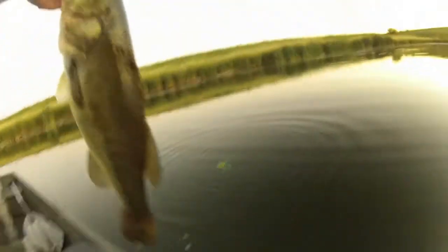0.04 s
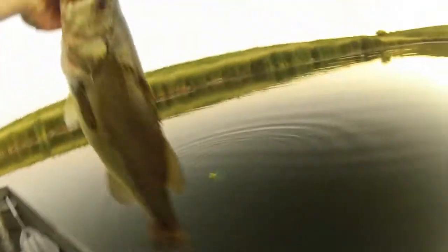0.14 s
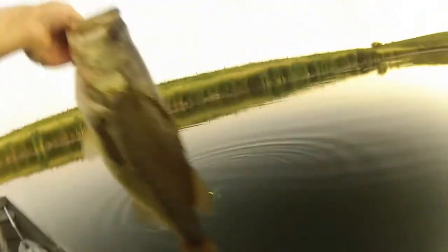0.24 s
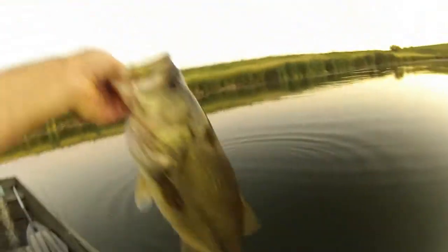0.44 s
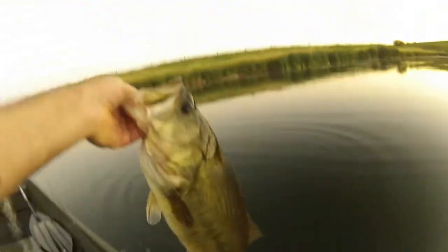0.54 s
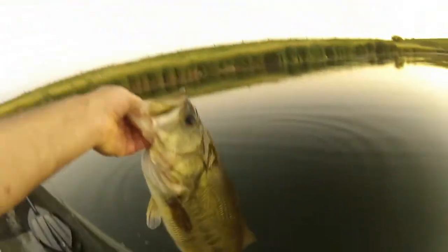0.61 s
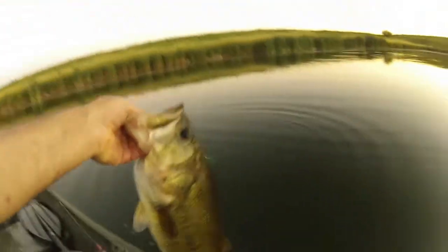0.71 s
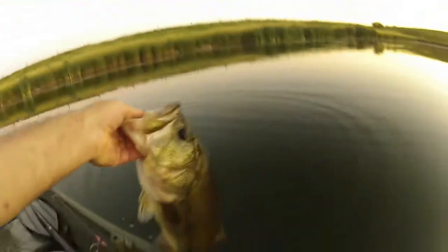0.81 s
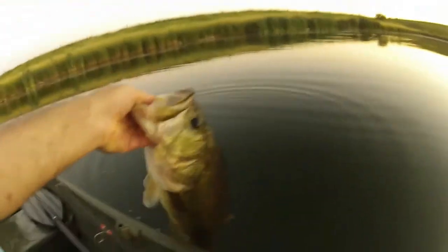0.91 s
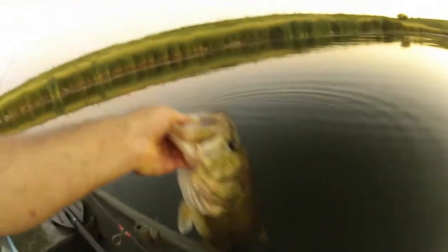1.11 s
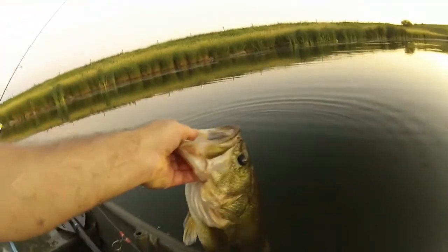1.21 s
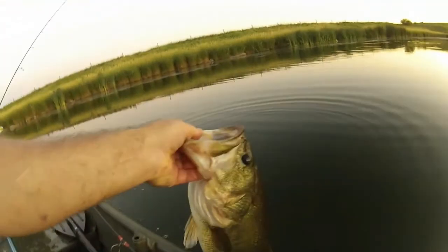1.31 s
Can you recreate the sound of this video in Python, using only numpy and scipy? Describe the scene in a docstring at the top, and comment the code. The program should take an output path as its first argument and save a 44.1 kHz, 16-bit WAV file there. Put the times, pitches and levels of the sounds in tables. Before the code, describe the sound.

A sharp, close knock on a small metal boat is followed by dull hull bumps and a quick clatter of loose gear. Soft rustling, a faint wash of pond water and a thin hiss lie underneath.

```python
"""Gear knocks once hard and several times lightly in a small metal boat on a still pond, as a fish is
handled. Each impact excites damped modes: loose parts clack, the hull thuds under shifting weight, and
stick-slip scuffs rattle it. The hull hums on after each bump, over soft rustling, a low wash and hiss.
A camera close by, in a housing, adds a thin sizzle to every low sound by aliasing."""
import sys
import numpy as np
from scipy import signal
from scipy.io import wavfile

SR = 44100
rng = np.random.default_rng(int(sys.argv[2]) if len(sys.argv) > 2 else 0)


def wrap_up_sound(samples):
    """Save the sound to the file named by the first command line argument, as 16-bit audio."""
    columns = np.atleast_2d(samples).T
    # keep every value between -1 and 1, then stretch to whole-number steps
    tamed = np.clip(columns, -1, 1)
    steps = np.round(tamed * 32767).astype(np.int16)
    wavfile.write(sys.argv[1], SR, steps)


N = 59535
T = np.arange(N) / SR
HZ = np.fft.rfftfreq(8192, 1 / SR)


def amp(db):
    """Amplitude grows tenfold for every 20 dB."""
    return 10 ** (np.asarray(db) / 20)


def unit_rms(x):
    """Normalisation to a mean power of one."""
    return x / np.sqrt(np.mean(x ** 2) + 1e-20)


def curve_at(points, hz):
    """Linear interpolation along a logarithmic frequency axis."""
    point_hz, value = np.transpose(points)
    return np.interp(np.log(hz + 1), np.log(point_hz + 1), value)


def convolve(x, response):
    """A linear system convolves its input with its impulse response."""
    return signal.fftconvolve(x, response)[:N]


def minimum_phase(gain):
    """Impulse response for a gain on HZ; the Hilbert transform of the log gain sets the phase."""
    log_gain = np.log(np.maximum(np.r_[gain, gain[-2:0:-1]], 1e-5))
    spectrum = np.exp(np.conj(signal.hilbert(log_gain)))
    return np.fft.ifft(spectrum).real[:len(gain)]


def colour(x, spectrum):
    """Spectral shaping redistributes the power of white sound and keeps its total."""
    return convolve(x, minimum_phase(unit_rms(amp(curve_at(spectrum, HZ)))))


def bed(drive, spectrum, levels):
    """Slow amplitude modulation of a continuous, coloured sound."""
    return colour(drive, spectrum) * amp(np.interp(T, *np.transpose(levels)))


def ring(modes):
    """Modal superposition: a sum of damped sines, with neighbouring modes in opposite phase."""
    return sum((-1) ** k * amp(db - 60 * T / t60) * np.sin(2 * np.pi * hz * T)
               for k, (hz, db, t60) in enumerate(modes))


def burst(start, rise, fade):
    """A linear rise, then exponential decay with time constant fade; all in seconds."""
    return np.clip((T - start) / rise, 0, 1) * np.exp(-np.maximum(T - start - rise, 0) / fade)


def radiate(x, low_hz):
    """A body small against the wavelength radiates poorly, here below low_hz."""
    return signal.sosfilt(signal.butter(2, low_hz, "highpass", fs=SR, output="sos"), x)


def slips(per_second=3500, spread_db=3):
    """Stick-slip friction releases a dense, random train of clicks of uneven size."""
    size = amp(spread_db * np.minimum(rng.exponential(1, N), 3))
    sign = rng.choice([-1., 1.], N)
    slipping = rng.random(N) < per_second / SR
    return unit_rms(size * sign * slipping)


def sizzle(x, mirror_hz=8000, top_hz=1120, tilt_hz=2020):
    """Aliasing in the camera: low tones reappear faintly on both sides of mirror_hz."""
    low = signal.sosfilt(signal.butter(4, top_hz, fs=SR, output="sos"), x)
    tilted = signal.lfilter(*signal.butter(1, tilt_hz, "highpass", fs=SR), low)
    return amp(-11) * tilted * 2 * np.cos(2 * np.pi * mirror_hz * T)


# Spectra of the wash and the hiss. Each row: frequency in Hz, relative spectral density in dB.
WASH_SPECTRUM = [(20, -26), (50, -8.5), (100, -9), (170, -0.5), (310, -1), (450, -8.5), (700, -17),
                 (1000, -33.5), (2000, -54)]
HISS_SPECTRUM = [(500, 7.5), (1500, -7.5), (2300, 8), (3400, -6.5), (4600, -9.5), (5700, 1), (6600, -20),
                 (7800, -5), (8400, -14), (9400, -26), (10400, -1.5), (12000, -32), (13600, -8),
                 (15000, -21), (16000, -39)]
# Their envelopes. Each row: time in seconds, level in dB.
WASH_ENVELOPE = [(0, -55.5), (.08, -53), (.45, -50), (.75, -51), (0.999, -43), (1.151, -51), (1.35, -51)]
HISS_ENVELOPE = [(0, -60), (.42, -73), (.65, -63.5), (.95, -60.5), (1.08, -64), (1.2, -60), (1.35, -66.5)]
def wash_and_hiss():
    """Filtered Gaussian noise gives the low wash of water on the hull and a faint hiss."""
    wash, hiss = rng.standard_normal((2, N))
    return bed(wash, WASH_SPECTRUM, WASH_ENVELOPE) + bed(hiss, HISS_SPECTRUM, HISS_ENVELOPE)


# Spectrum of the rustle. Each row: frequency in Hz, relative spectral density in dB.
RUSTLE_SPECTRUM = [(100, -19), (300, 4.5), (650, 13.5), (1000, 1.5), (2000, -2.5), (3300, -4.5), (5000, -8),
                   (6500, -14), (9000, -19), (13000, -10.5), (15000, -30), (16000, -27)]
# Its envelope. Each row: time in seconds, level in dB.
RUSTLE_ENVELOPE = [(0, -66), (.035, -52.5), (.07, -51.5), (0.129, -48.5), (0.232, -51.5), (.3, -60),
                   (.45, -62.5), (.58, -72), (.765, -58), (0.859, -57), (0.899, -54), (.98, -52.5),
                   (1.051, -66.5), (1.35, -58.5)]
def rustle():
    """Sliding friction of hand and clothes: many small slips merge into a soft noise."""
    return bed(slips(), RUSTLE_SPECTRUM, RUSTLE_ENVELOPE)


# Reverberation of the boat. Each row: frequency in Hz, gain in dB, time to decay 60 dB in seconds.
BOAT_DECAY = [(60.4, -7, 0.74), (150, -9, 1), (213, -8, 0.2), (353, -9, 0.4), (475, -6.5, 0.16),
              (620, -14, 0.28), (830, -1, 0.21), (1340, -13, 0.27), (3080, -15.5, 0.11), (15000, -30, 0.12)]
def after_ring(bumps, rise_s=0.027):
    """Reverberation: the boat's many weak modes overlap as noise, each band decaying at its own rate."""
    bands = np.array(BOAT_DECAY)
    hz, t, noise = signal.stft(rng.choice([-1., 1.], N), SR, nperseg=512)
    db = curve_at(bands[:, :2], hz)[:, None]
    t60 = curve_at(bands[:, ::2], hz)[:, None]
    equal_energy = np.sqrt(2 * np.log(1000) / (t60 * SR))  # longer decays start lower
    gain = amp(db - 60 * t / t60) * equal_energy
    tail = signal.istft(noise * gain, SR, nperseg=512)[1][:N]
    return convolve(bumps, tail * np.minimum(T / rise_s, 1))


# Rough rubs. Each row: start, rise and decay constant in seconds, body level in dB, grit level in dB.
RUBS = [(0.04, 0.0036, 0.027, -53, -73), (0.127, 0.017, 0.012, -44, -41), (0.185, 0.0043, .008, -37, -44),
        (0.468, 0.0017, 0.0043, -59, -55.5), (0.491, 0.0017, 0.058, -49.5, -56.5),
        (0.532, 0.0024, 0.007, -71, -55.5), (0.568, .001, 0.022, -39.5, -52),
        (0.6, 0.0064, 0.032, -43, -86), (0.661, 0.006, 0.0029, -43.5, -47),
        (0.772, 0.0011, 0.023, -31, -36), (0.808, 0.0053, 0.013, -26.5, -27),
        (0.845, 0.0031, 0.018, -28, -30), (0.91, 0.0041, 0.015, -28.5, -63),
        (1.309, 0.0034, 0.016, -40.5, -45)]
# The two spectra of a rub. Each row: frequency in Hz, relative spectral density in dB.
BODY_SPECTRUM = [(30, -41), (70, -32), (150, -6.5), (230, -3), (370, 4.5), (460, -8), (590, 2), (760, -6),
                 (950, -22), (1500, -38), (4000, -48)]
GRIT_SPECTRUM = [(50, -37), (200, -17), (700, 10.5), (1100, 5.5), (1600, 2), (2200, 0.5), (3500, -7),
                 (5800, -8), (6700, -9.5), (8500, -28), (9500, -11), (10500, -10), (13800, -18),
                 (15000, -34), (16000, -73)]
def scuffs():
    """Stick-slip friction in short runs, heard as a hollow body and as bright grit."""
    body = sum(amp(db) * burst(start, rise, fade) for start, rise, fade, db, _ in RUBS)
    grit = sum(amp(db) * burst(start, rise, fade) for start, rise, fade, _, db in RUBS)
    return colour(body * slips(), BODY_SPECTRUM) + colour(grit * slips(), GRIT_SPECTRUM)


# Soft blows on the hull. Each row: start in seconds, impulse level in dB, contact time in seconds.
SOFT_BLOWS = [(0.1830, -44.5, 0.00085), (0.2650, -27, 0.0054), (0.4924, -40, 0.00068),
              (0.5160, -41, 0.0027), (0.5760, -21, 0.0034), (0.6010, -21, 0.0039), (0.631, -30.5, 0.0019),
              (0.6620, -33.5, 0.003), (0.6880, -31, 0.0042), (0.7270, -41, 0.0041), (0.809, -31, 0.0024),
              (0.8440, -28.5, 0.0026), (1.309, -45.5, 0.0013)]
# Hull modes. Each row: frequency in Hz, relative level in dB, time to decay 60 dB in seconds.
HULL_MODES = [(82, -29, 0.05), (131, -2, 0.11), (162.7, -6.5, 0.17), (225, -3.5, 0.142), (275, -5.5, 0.13),
              (284, -4.5, 0.062), (339, -10.5, 0.27), (384, -8, 0.25)]
def thuds():
    """Half-sine force pulses drive the hull's low modes; a longer contact gives a duller sound."""
    force = np.zeros(N)
    for start, db, contact in SOFT_BLOWS:
        push = np.sin(np.pi * np.clip((T - start) / contact, 0, 1))
        force += amp(db) * push / (push.sum() + 1e-9)
    return radiate(convolve(force, ring(HULL_MODES)), low_hz=91)


# Loose parts. Each row: start in seconds, frequency in Hz, level in dB, time to decay 60 dB in seconds.
LOOSE_PARTS = [(0.0410, 637, -42.5, 0.055), (0.041, 3150, -43.5, 0.029), (0.1880, 394, -41.5, 0.042),
               (0.3200, 599, -33.5, .09), (0.3250, 236.5, -35, 0.21), (0.4940, 433, -30.5, 0.039),
               (0.5780, 390, -33.5, 0.042), (0.6652, 1160, -37, 0.018), (0.6660, 359, -30, 0.043),
               (0.7740, 744, -34, 0.18), (0.8110, 176, -27.5, 0.12), (0.8120, 2186, -29, 0.047),
               (0.8190, 615, -27, 0.064), (0.8477, 2120, -23.5, 0.019), (0.8140, 5870, -39, 0.022),
               (0.847, 5830, -33.5, 0.027), (0.8500, 177, -28.5, 0.1), (0.8580, 568, -23.5, 0.086),
               (0.9180, 615.4, -32, 0.15), (0.9680, 355, -36.5, 0.14), (1.0120, 337, -37, 0.18),
               (1.3110, 278, -29, 0.045), (1.3120, 524, -36, 0.077)]
def clacks():
    """Each loose part is a damped oscillator that builds up in one period and quickly dies away."""
    return sum(amp(db) * burst(start, 1 / hz, t60 / np.log(1000)) * np.sin(2 * np.pi * hz * (T - start))
               for start, hz, db, t60 in LOOSE_PARTS)


# Spectrum of a knock's crack. Each row: frequency in Hz, relative spectral density in dB.
CRACK_SPECTRUM = [(50, -26), (200, -3), (400, 14), (900, 4.5), (1400, -8.5), (2900, 1), (3800, -7),
                  (5000, -4), (6600, -17.5), (7500, -18), (9500, -18.5), (11000, -9), (13300, -10.5),
                  (15000, -31), (16000, -30)]
def crack(envelope):
    """A brief transient has a wide spectrum: the knock's attack is a burst of bright noise."""
    return colour(envelope * rng.standard_normal(N), CRACK_SPECTRUM)


# Hard contacts; the loud knock is three in quick succession.
# Each row: start in seconds, ring gain in dB, crack gain in dB.
HARD_CONTACTS = [(0.0408, -45, -38.5), (0.2416, -11, -23.5), (0.2440, -28, -21), (0.2470, -19.5, -34),
                 (0.4938, -47.5, -52), (0.569, -42, -49.5), (0.6645, -39, -63), (0.7729, -34.5, -32),
                 (0.8133, -41, -30), (0.8274, -38, -35.5), (0.849, -32.5, -31), (0.9215, -34, -59),
                 (1.1184, -48, -57.5), (1.3150, -47, -47)]
# The knock's short ring of gear and longer ring of the hull.
# Each row: frequency in Hz, relative level in dB, time to decay 60 dB in seconds.
KNOCK_MODES = [(241.2, -15, 0.32), (326, -8.5, 0.14), (359, -17.5, 0.34), (383, 4.5, 0.024),
               (484, -13, 0.17), (560.8, 1.5, 0.075), (606, -33, 0.51), (658, -14, 0.33), (755, -10, 0.092),
               (2130, -19.5, 0.039), (2430, -42, 0.04), (2435, -20, 0.064), (2790, -28, 0.045),
               (3210, -25, 0.077), (4900, -27, 0.057), (5157, -32, 0.067), (5700, -27.5, 0.073)]
def knocks(ring_rise_s=0.0013, crack_rise_s=0.00036):
    """Impulse excitation: each hard contact cracks, rings the gear briefly and the hull for longer."""
    impulses, crack_envelope = np.zeros((2, N))
    for start, ring_db, crack_db in HARD_CONTACTS:
        impulses += amp(ring_db) * np.sinc((T - start) * SR)
        snap = burst(start, crack_rise_s, fade=0.0041)
        tail = amp(-10) * burst(start, crack_rise_s, fade=0.017)
        crack_envelope += amp(crack_db) * (snap + tail)
    response = radiate(ring(KNOCK_MODES) * np.minimum(T / ring_rise_s, 1), low_hz=210)
    return convolve(impulses, response) + crack(crack_envelope)


def scene():
    """Superposition of the bumps, their reverberation and the background, in one channel."""
    bumps = knocks() + clacks() + thuds() + scuffs()
    background = wash_and_hiss() + rustle()
    return (bumps + after_ring(bumps) + background)[None]


# The camera's treble notches. Each row: centre in Hz, half width in Hz, depth in dB.
TREBLE_NOTCHES = [(4014, 370, 12), (7946, 140, 48), (11900, 320, 19)]
def record(dry, edge_hz=15800):
    """The camera's transfer: three notches and the aliased sizzle, then a band limit at edge_hz."""
    dips_db = sum(depth * np.exp(-((HZ - hz) / width) ** 2) for hz, width, depth in TREBLE_NOTCHES)
    heard = convolve(dry[0], minimum_phase(amp(-dips_db))) + sizzle(dry[0])
    band_limit = signal.firwin(255, edge_hz, window=("kaiser", 9), fs=SR)
    return signal.fftconvolve(heard, band_limit, "same")[None]


dry = scene()
out = record(dry)
wrap_up_sound(out)
```